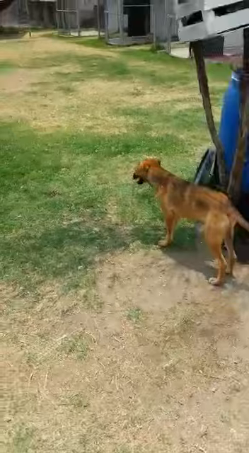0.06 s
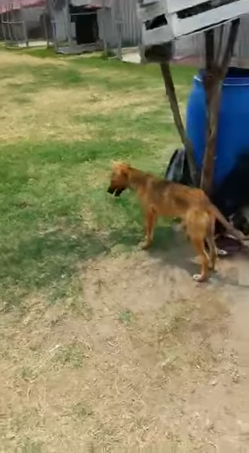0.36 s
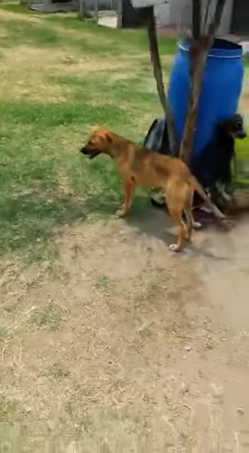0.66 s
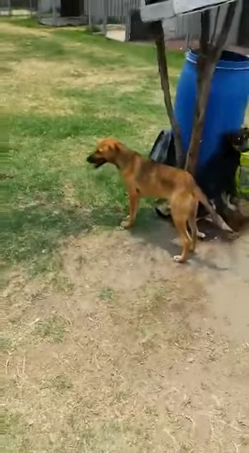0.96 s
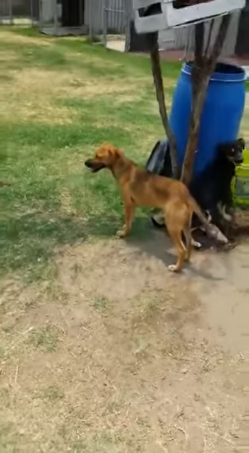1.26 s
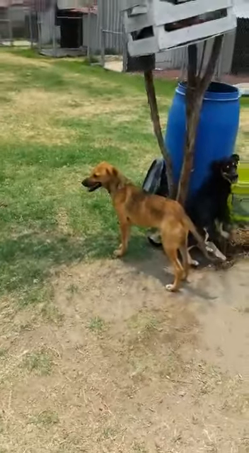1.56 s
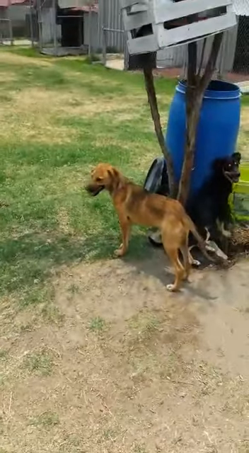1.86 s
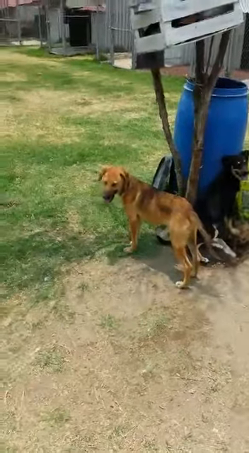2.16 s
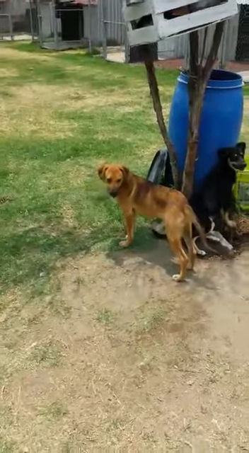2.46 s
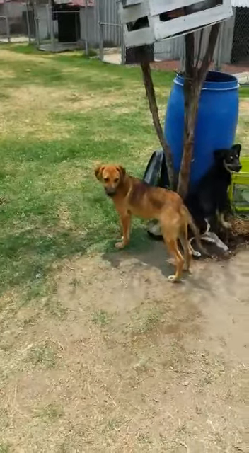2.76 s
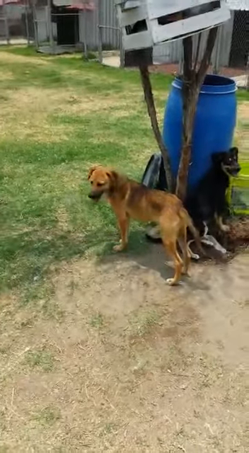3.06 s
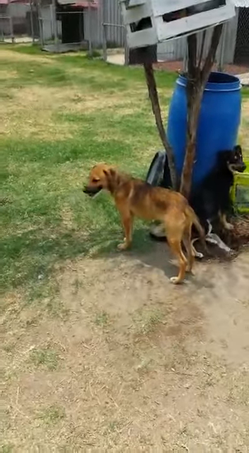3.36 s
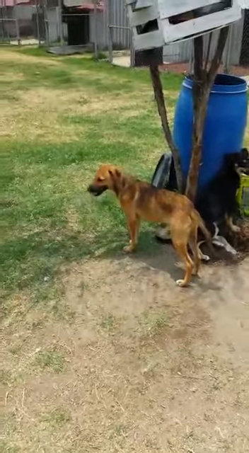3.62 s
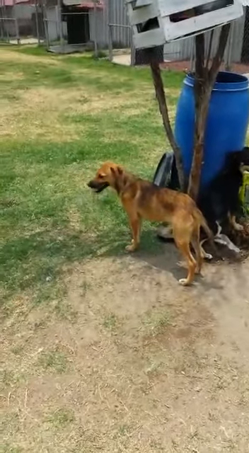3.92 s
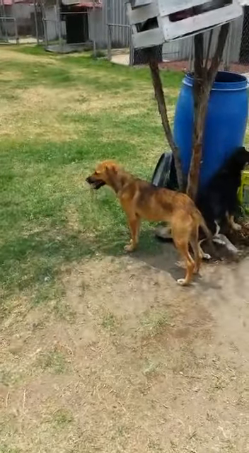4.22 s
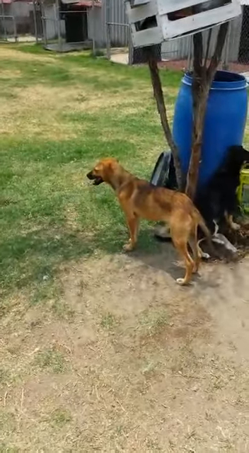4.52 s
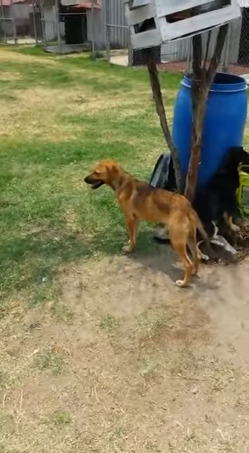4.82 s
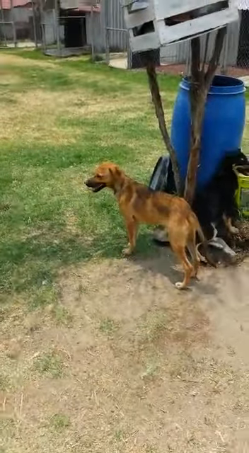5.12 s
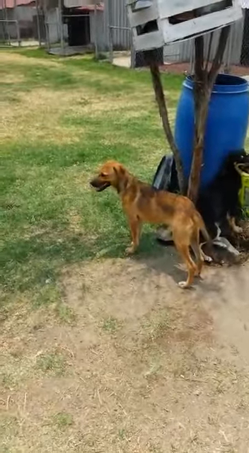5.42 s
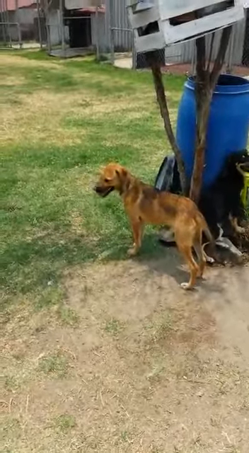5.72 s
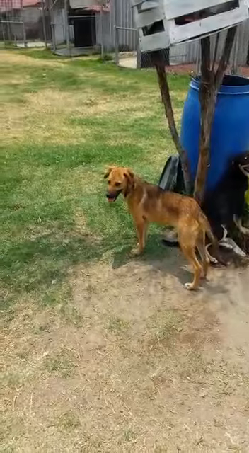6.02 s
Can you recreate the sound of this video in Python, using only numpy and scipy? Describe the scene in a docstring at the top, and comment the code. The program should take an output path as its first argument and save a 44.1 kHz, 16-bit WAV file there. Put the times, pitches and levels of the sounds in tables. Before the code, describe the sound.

Two dogs bark in turn in a yard while sparrows chirp and gusts of wind rumble on the microphone.

```python
"""A grassy yard, heard through the two microphone ports of a hand-held phone.
Two dogs bark in turn, uneven vocal folds and rasping air ringing the throat; sheds throw each bark
back and a far dog yelps once. Sparrows whistle and chatter in the trees, two-voiced from the syrinx.
Gusts buffet each port on its own with rumble and eddy slaps, over an outdoor wash and a thin whine."""
import sys
import numpy as np
from scipy import signal
from scipy.fft import rfft, irfft
from scipy.io import wavfile
from scipy.ndimage import uniform_filter1d, map_coordinates

SR = 44100
rng = np.random.default_rng(int(sys.argv[2]) if len(sys.argv) > 2 else 0)


def to_wav(s):
    """Save 16-bit WAV."""
    ch = np.atleast_2d(s).T  # columns
    pcm = np.round(np.clip(ch, -1, 1) * 32767)  # PCM
    wavfile.write(sys.argv[1], SR, pcm.astype(np.int16))


N = 272538
TIME = np.arange(N) / SR
FREQ = np.fft.rfftfreq(N, 1 / SR)


def undb(db):
    """Decibels to gain."""
    return 10 ** (np.asarray(db) / 20)


def unit_rms(x):
    """Scale to rms 1."""
    return x / np.sqrt(np.mean(x ** 2) + 1e-18)


def curves(table, at):
    """Interpolate each later column over the first."""
    first, *columns = np.transpose(table)
    return [np.interp(at, first, column) for column in columns]


def spectrum(table, hz):
    """Gain from (freq_hz, gain_db) points on a log-frequency axis."""
    points_hz, db = np.transpose(table)
    return undb(np.interp(np.log(hz + 1e-3), np.log(points_hz), db))


def colour(x, table):
    """Filter by (freq_hz, gain_db) points."""
    size = x.shape[-1]
    return irfft(rfft(x) * spectrum(table, np.fft.rfftfreq(size, 1 / SR)), size)


def wander(size, rate_hz):
    """Smooth random curve, spread about 1."""
    at = np.arange(size) / SR * rate_hz
    return map_coordinates(rng.standard_normal(4096), [at], order=3, mode="wrap")


def jittered_phase(hz, size, jitter, rate_hz):
    """Phase of an oscillator whose pitch wanders by the fraction jitter."""
    return 2 * np.pi * np.cumsum(hz * (1 + jitter * wander(size, rate_hz))) / SR


def add(track, start_s, x):
    """Mix x into track at start_s."""
    start = max(int(start_s * SR), 0)
    part = track[..., start:start + x.shape[-1]]
    part += x[..., :part.shape[-1]]


def ports(x, left_lag_s):
    """Stereo pair; sound reaches the left port left_lag_s after the right."""
    left = irfft(rfft(x) * np.exp(-2j * np.pi * FREQ * left_lag_s), N)
    return np.array([left, x])


def balance(pair, table):
    """Each port has its own colour: split a left-minus-right curve between them."""
    tilt = np.sqrt(spectrum(table, FREQ))
    return irfft(rfft(pair) * np.array([tilt, 1 / tilt]), N)


# wash spectrum: freq_hz, gain_db
AIR_SPECTRUM = [(40, -1), (150, -1.5), (350, -7), (500, -10), (700, -10.5), (1400, -12.5), (3000, -14),
                (6500, -15), (8600, -15), (9600, -21), (11000, -19.5), (12000, -22.5), (15500, -21.5)]
# wash envelope: time_s, level_db
AIR_LEVEL = [(0, -48.5), (.6, -49), (2.4, -48), (3.3, -48), (4.1, -50), (4.6, -51.5), (5.2, -50),
             (6.18, -46.5)]
# wash balance: freq_hz, left_minus_right_db
AIR_BALANCE = [(300, 0), (1300, 3.5), (4400, 3.5), (6600, 6), (8300, -13), (10500, -15.5), (12000, 0.5),
               (15000, -1)]
# electronic whine: freq_hz, left_db, right_db
WHINE = [(8000, -86, -76), (10000, -74, -59)]


def background(flicker_db=.7):
    """Distant outdoor wash and microphone hiss, plus the phone's thin whine."""
    level_db, = curves(AIR_LEVEL, TIME)
    common = colour(rng.standard_normal(N), [(200, 8), (600, 2), (1300, -2.5), (3000, -12.5)])
    wash = unit_rms(colour(rng.standard_normal((2, N)) + common, AIR_SPECTRUM))
    wash *= undb(level_db + flicker_db * wander(N, 6))
    whine = sum(undb([[left_db], [right_db]]) * np.sqrt(2) * np.sin(2 * np.pi * hz * TIME)
                for hz, left_db, right_db in WHINE)
    return balance(wash, AIR_BALANCE) + whine


# one chirrup (flick, fall, lower arch):
# delay_s, length_s, start_ratio, mid_ratio, end_ratio, gain_db, second_voice_gain
CHIRRUP_SYLLABLES = [(0, .018, 1.02, 1.18, 1.32, -1, .2), (.012, .056, 1, 1, .74, 1.5, 1),
                     (.09, .058, .6, .85, .58, -2, .3)]
# chirrups: start_s, pitch_hz, level_db, second_voice_gain
CHIRRUPS = [(0.288, 4400, -43, .3), (1.859, 4420, -43, .9), (3.578, 4430, -49, 0.86),
            (5.467, 4420, -45, 0.8)]
# falling whistles: start_s, length_s, start_hz, level_db
SLURS = [(0.01, .036, 5120, -51), (1.66, .044, 6160, -48), (3.094, 0.043, 3970, -58),
         (4.489, .083, 3700, -62), (4.784, 0.066, 3860, -54), (5.023, 0.065, 3500, -57),
         (5.28, .05, 4000, -58), (5.529, 0.027, 4800, -39.5), (5.538, 0.071, 3410, -47),
         (5.586, 0.043, 3690, -51), (5.978, 0.053, 3580, -55.5)]
# bent peeps: start_s, mid_hz, ends_ratio, level_db
PEEPS = [(1.095, 4520, 0.94, -54), (1.644, 2990, .88, -56.5), (2.322, 4340, 1.12, -48.5),
         (2.41, 4490, 0.95, -52.5), (2.711, 4230, .95, -57), (3.079, 4410, 1.03, -51),
         (3.984, 4750, 0.89, -53), (4.17, 3880, 1, -57)]


def syllables(slur_ref_hz=3703, slur_octaves_per_s=11, slur_mid_ratio=1.06, peep_s=.051):
    """Yield sparrow syllables: start_s, length_s, (start, mid, end)_hz, level_db, second_voice_gain."""
    for start_s, hz, db, second_gain in CHIRRUPS:
        for delay_s, length_s, *ratios, part_db, part_second in CHIRRUP_SYLLABLES:
            pitches_hz = hz * np.array(ratios)
            yield start_s + delay_s, length_s, pitches_hz, db + part_db, second_gain * part_second
    for start_s, length_s, hz, db in SLURS:
        octaves = slur_octaves_per_s * length_s * (hz / slur_ref_hz) ** 1.25  # higher falls faster
        pitches_hz = np.linspace(hz, hz / 2 ** octaves, 3) * [1, slur_mid_ratio, 1]
        yield start_s, length_s, pitches_hz, db, .15
    for start_s, hz, ends_ratio, db in PEEPS:
        yield start_s, peep_s, hz * np.array([ends_ratio, 1, ends_ratio]), db, .1


# harsh chatter further off: start_s, length_s, pitch_hz, level_db
CHATTER = [(0.0, 0.072, 5500, -46.5), (0.495, 0.22, 5650, -43.5), (1.159, 0.13, 5550, -44),
           (4.772, .19, 5530, -48), (5.218, .15, 5520, -49)]


def sparrows(second_ratio=1.095, flutter_db=2.5, wall_s=.015, wall_db=-8, yard_db=-5, right_db=-4.5):
    """Gliding whistles, the syrinx's other side just above, and buzzy chatter; a wall doubles both."""
    dry = np.zeros(N)
    for start_s, length_s, pitches_hz, db, second_gain in syllables():
        size = int(length_s * SR)
        glide_hz = np.polyval(np.polyfit([0, .5, 1], pitches_hz, 2), np.linspace(0, 1, size))
        for ratio, gain in ((1, 1), (second_ratio, second_gain)):
            whistle = np.sin(jittered_phase(glide_hz * ratio, size, jitter=.025, rate_hz=716))
            envelope = signal.windows.tukey(size, .3) * undb(db + flutter_db * wander(size, 161))
            add(dry, start_s, gain * whistle * envelope)
    for start_s, length_s, hz, db in CHATTER:
        size = int(length_s * SR)
        buzz = np.sin(jittered_phase(hz, size, jitter=.113, rate_hz=2200))
        envelope = signal.windows.tukey(size, .7) * undb(db + flutter_db * wander(size, 116.5))
        add(dry, start_s, buzz * envelope)
    direct = ports(dry, left_lag_s=.00028)
    wall = np.roll(ports(dry, left_lag_s=-.000386), int(wall_s * SR), axis=1)
    return (direct + undb(wall_db) * wall + undb(yard_db) * yard(dry)) * undb([[0], [right_db]])


# yard reverberation: band_hz, t60_s, gain_db
YARD_BANDS = [(304, 0.57, 2.5), (835, .7, 7), (1380, 0.72, 6.5), (2310, 0.82, -1.5), (4140, 1, 1.5),
              (4970, 0.38, 5), (5740, 0.51, 1), (7700, 0.092, -21), (14250, 0.49, -8)]


def yard(x, coherence_hz=900, build_s=.008):
    """Scatter off sheds, fences and trees builds, then decays by band; lows are alike at both ports."""
    t = TIME[:SR]
    hz = np.fft.rfftfreq(SR, 1 / SR)
    band_hz, t60_s, gain_db = np.transpose(YARD_BANDS)
    coherence = np.exp(-(hz / coherence_hz) ** 2 / 2)
    mid, side = rfft(rng.standard_normal((2, SR))) * np.sqrt([1 + coherence, 1 - coherence])
    tail = 0
    for k, selector in enumerate(np.eye(len(band_hz))):
        band_gain = np.interp(np.log(hz + 1), np.log(band_hz), selector)
        band = irfft(np.array([mid + side, mid - side]) * band_gain, SR)
        fade = undb(-60 * t / t60_s[k]) * (1 - np.exp(-t / build_s))
        tail = tail + undb(gain_db[k]) * band * fade / np.sqrt(2 * np.sum(fade ** 2))
    return signal.fftconvolve(x[None], tail, axes=1)[:, :N]


# gusts: start_s, hold_s, left_db, right_db
GUSTS = [(0.30, 0.04, -56, -39.5), (0.489, 0.13, -28.5, -45.5), (0.673, 0.12, -45, -27),
         (0.827, 0.13, -31, -19.5), (0.967, 0.23, -33.5, -24.5), (1.195, 0.094, -25.5, -26),
         (1.31, 0.14, -43, -27), (1.49, 0.14, -31, -23), (1.627, 0.053, -21.5, -31),
         (1.733, .21, -37, -25.5), (1.98, 0.042, -17.5, -38), (2.075, 0.045, -20.5, -22),
         (2.166, 0.13, -18, -30), (2.481, 0.11, -59, -25.5), (2.611, 0.16, -29.5, -26.5),
         (2.854, 0.12, -35, -40), (3.168, .14, -46, -28.5), (3.425, 0.16, -41, -27), (3.66, .16, -32, -33),
         (3.88, 0.14, -51, -43.5), (4.368, 0.055, -41, -43), (4.799, 0.12, -31, -40.5),
         (4.917, 0.055, -35, -28.5), (5.052, 0.077, -33, -53), (5.252, 0.11, -51, -22),
         (5.379, 0.092, -19.5, -17), (5.606, 0.13, -37, -25.5), (5.785, 0.015, -46, -20.5),
         (6.015, 0.088, -20.5, -21), (6.159, .03, -18.5, -16)]


def gusts(rise_db_per_s=589, fall_db_per_s=307, breeze_db=-55.5):
    """Wind level per port in dB: each gust rises fast, holds and dies away over a light breeze."""
    power = undb(breeze_db) ** 2
    for start_s, hold_s, left_db, right_db in GUSTS:
        before_s = np.maximum(start_s - TIME, 0)
        after_s = np.maximum(TIME - start_s - hold_s, 0)
        fade_db = np.minimum(rise_db_per_s * before_s + fall_db_per_s * after_s, 100)
        power = power + (undb([[left_db], [right_db]]) * undb(-fade_db)) ** 2
    return 10 * np.log10(power)


# rumble of a light flow: freq_hz, gain_db
RUMBLE_SPECTRUM = [(12, -30), (30, -20.5), (65, 0.5), (110, 2), (160, -3.5), (250, -17), (400, -43.5),
                   (700, -54), (1500, -80)]
# rush added by a hard gust: freq_hz, gain_db
RUSH_SPECTRUM = [(60, -2), (130, -5), (220, -3.5), (400, -13.5), (650, -34), (1100, -42.5), (2500, -57.5)]


def wind_on_port(gust_db, rumble_db=-.5, rush_db=-30, rush_growth=1.98, lumpy_db=3.5):
    """Turbulence at one port: harder flow makes smaller eddies, so the rumble reaches higher."""
    level_db = gust_db + lumpy_db * (wander(N, 55) - .3)
    layers = []
    for shape in (RUMBLE_SPECTRUM, RUSH_SPECTRUM):
        flow = unit_rms(colour(rng.standard_normal(N), shape))
        power = uniform_filter1d(np.abs(signal.hilbert(flow)) ** 2 / 2, size=900)
        layers.append(flow / np.sqrt(power + .0078))  # flattened, so level_db sets the envelope
    rumble, rush = layers
    return undb(level_db + rumble_db) * rumble + undb(rush_db + rush_growth * (level_db + 20)) * rush


def small_eddies(gust_db, rate_per_s=9, over_wind_db=9.5, spread_db=.5, centre_hz=165, spread_oct=.25):
    """Yield random eddies that scale with the wind carrying them; rows as in HARD_EDDIES."""
    count = rate_per_s * N // SR
    for port, wind_db in zip(("left", "right"), gust_db):
        for at, (strength, pitch) in zip(rng.integers(0, N, count), rng.standard_normal((count, 2))):
            level_db = wind_db[at] + over_wind_db + spread_db * strength
            yield at / SR, level_db, centre_hz * 2 ** (spread_oct * pitch), port


# hardest slaps on a port: time_s, level_db, centre_hz, port
HARD_EDDIES = [(0.552, -20, 199, "left"), (1.151, -2.5, 103, "right"), (1.269, -11, 212, "left"),
               (1.641, -6, 220, "left"), (1.683, -11.5, 149, "left"), (2.098, 0, 212, "left"),
               (2.179, -4.5, 292, "left"), (2.188, -8, 156, "left"), (2.217, -9, 190, "left"),
               (2.288, -4, 180, "left"), (2.365, -13, 160, "left"), (2.552, -10, 170, "right"),
               (2.634, -9.5, 133, "left"), (3.381, -11.5, 132, "right"), (3.435, -10, 236, "right"),
               (3.555, -9.5, 153, "right"), (4.983, -19.5, 186, "left"), (5.238, -7.5, 145, "right"),
               (5.281, -3.5, 147, "right"), (5.374, -2.5, 193, "right"), (5.438, -10, 220, "left"),
               (5.635, -9.5, 230, "right"), (5.677, -4.5, 149, "right"), (5.692, -7.5, 164, "right"),
               (6.072, -6.5, 207, "right")]


def eddies(gust_db, gain_db=-2, skirt=1.876, snap_db=-13, snap_ratio=1.69, leak_db=-35):
    """An eddy crossing a port pushes and sucks: one lopsided pressure swing with a faster core snap."""
    out = np.zeros((2, N))
    t = np.arange(-SR // 50, SR // 50) / SR
    slaps = HARD_EDDIES + list(small_eddies(gust_db))
    for (time_s, db, hz, port), skew_rad in zip(slaps, rng.uniform(-1.06, 1, len(slaps))):
        body, core = (np.real(1j * np.exp(1j * skew_rad) / (1 - 1j * np.pi * f * t / skirt) ** 4)
                      for f in (hz, hz * snap_ratio))
        swing = body + undb(snap_db) * core
        swing = colour(swing, [(20, -22), (70, -2.5), (600, -2), (1000, 4.5), (2000, -38)])
        port_db = np.where([[port == "left"], [port == "right"]], 0, leak_db)
        add(out, time_s + t[0], undb(db + gain_db + port_db) * swing * np.hanning(len(t)))
    return out


def throat(x, resonances, freq_scale):
    """Steep parallel resonances of throat and mouth; freq_scale shifts them all."""
    f = (np.fft.rfftfreq(len(x), 1 / SR) + 1e-3) / freq_scale
    response = sum(undb(db) / (1 + 1j * (f * f - hz * hz) / (f * width_hz)) ** 2
                   for hz, width_hz, db in resonances)
    return irfft(rfft(x) * response, len(x))


# pitch arch of a bark: length_fraction, top_pitch_ratio
BARK_PITCH = [(0, .55), (.18, .64), (.3, .76), (.42, .85), (.55, .92), (.68, .985), (.8, 1.0), (1, .93)]
# course of a bark: length_fraction, level_db, roughness_gain, treble_db
BARK_SHAPE = [(0, -22, 0.8, -7), (.15, -13.5, .5, 8), (.3, -4, 0, 1.5), (.45, 0, 0.31, 4.5),
              (.65, -1.5, 0.04, 5.5), (.8, -3, 0.39, -10), (.9, -15.5, 0.15, -8), (1, -1, 0.65, -6)]


def bark(resonances, top_hz, arch_depth, length_s, gain_db, rasp_db, mouth_treble_db,
         shimmer=.28, subharmonic_db=-20, hiss_db=-6, rolloff_hz=2800):
    """Vocal folds rise in pitch and beat unevenly; air rasps through once a cycle; the jaws open."""
    size = int(length_s * SR)
    course = np.arange(size) / size
    pitch_hz = top_hz * curves(BARK_PITCH, course)[0] ** arch_depth
    level_db, roughness, treble_db = curves(BARK_SHAPE, course)
    phase = jittered_phase(pitch_hz, size, jitter=.012, rate_hz=263.2)
    k = np.arange(1, 25)[:, None]
    spread_rad = np.pi * k * k / 10  # the folds close along their length, spreading each pulse
    rolloff = np.sqrt(1 + (k * top_hz / rolloff_hz) ** 4)
    folds = np.sum(np.cos(k * phase - spread_rad) / rolloff, axis=0)
    # strong and weak cycles put lines between the harmonics
    folds *= 1 + shimmer * wander(size, 349.5) + 2 * undb(subharmonic_db) * np.cos(phase / 2)
    air = rng.standard_normal(SR)[:size] * (1 + 1.02 * np.cos(phase))
    hiss = colour(air, [(1500, -5), (2600, -17), (4500, -11), (9000, 3), (14000, -11)])
    rasp = 5 * (roughness * air + undb(hiss_db) * hiss)
    source = (folds + undb(rasp_db) * rasp) * undb(level_db) * signal.windows.tukey(size, .1)
    treble = colour(source, [(700, -72), (1400, -1), (4000, -8.5)])
    source += (undb(treble_db + mouth_treble_db) - 1) * treble
    # half-shut jaws lower the resonances at the start
    jaw = np.interp(course, [.28, .52], [0, 1])
    shut, wide = np.pad([source * (1 - jaw), source * jaw], ((0, 0), (0, SR // 20)))
    voice = undb(1) * throat(shut, resonances, freq_scale=.878)
    voice += throat(wide, resonances, freq_scale=.96)
    return undb(gain_db) * voice


# barks: start_s, top_hz, arch_depth, length_s, gain_db, rasp_db, mouth_treble_db
FIRST_DOG_BARKS = [(0.551, 403.4, 0.94, 0.15, -27, 1, -4.5), (0.80, 357.4, 0.34, 0.15, -30.5, 2, -22),
                   (1.278, 371.4, .55, .15, -30.5, 0.5, -6.5), (1.915, 405, 0.89, 0.16, -26, -0.5, 0.5)]
SECOND_DOG_BARKS = [(3.690, 410.8, 0.99, .15, -27, -1.4, 1.4), (4.194, 406.6, 0.99, .15, -34.5, -3.5, 0.64)]
# throat and mouth resonances before freq_scale: centre_hz, width_hz, gain_db
FIRST_DOG_THROAT = [(465, 282, -1), (736, 186, -1), (1124, 370, -9), (1506, 92, -6), (2180, 460, -11.5),
                    (2780, 330, -11.5), (3430, 540, -14), (5280, 220, -4.5), (5950, 460, -9),
                    (6600, 1020, -12), (7800, 290, -18), (11400, 4900, -37)]
SECOND_DOG_THROAT = [(489, 280, 2), (784, 230, 1), (1060, 290, -7.5), (1512, 117, -4.5), (1944, 200, -5.5),
                     (2240, 220, -7.5), (3500, 510, -15), (5000, 180, -9), (5430, 220, -5.5),
                     (6260, 1430, -7), (6700, 360, -22), (7420, 450, -5), (8140, 800, -12),
                     (11100, 600, -30)]
# echoes off the sheds: delay_s, gain_db, left_lag_s
SHED_ECHOES = [(.028, -13.5, -0.018), (.062, -25, -0.025), (.092, -3, .0001), (.135, -18, -0.0071)]
# port colour for the barks: freq_hz, left_minus_right_db
BARK_BALANCE = [(300, 6.5), (750, -1), (1500, 1.5), (2300, 12), (3000, -8.5), (4000, 14.5), (4900, -2.5),
                (6500, 10.5), (7300, -5.5), (8300, -15.5), (9600, -22), (11500, -21), (14000, -10)]
DOG_LEFT_LAG_S = .00024


def dogs(yard_db=-7):
    """Barks arrive from the right, then again off the sheds, duller."""
    dry = np.zeros(N)
    for barks, resonances in ((FIRST_DOG_BARKS, FIRST_DOG_THROAT), (SECOND_DOG_BARKS, SECOND_DOG_THROAT)):
        for start_s, *call in barks:
            add(dry, start_s, bark(resonances, *call))
    out = ports(dry, DOG_LEFT_LAG_S)
    dull = colour(dry, [(400, -12), (650, -8), (810, 3.5), (1200, -20), (2500, -17.5),
                        (6000, -16), (12000, -15)])
    for delay_s, gain_db, left_lag_s in SHED_ECHOES:
        add(out, delay_s, undb(gain_db) * ports(dull, left_lag_s))
    return balance(out + undb(yard_db) * yard(dry), BARK_BALANCE)


# far dog's yelp: time_s, pitch_hz, level_db
YELP = [(2.90, 424.4, -75), (2.925, 446.3, -54), (2.96, 521.6, -54), (3.01, 549, -68), (3.05, 514, -50.5),
        (3.07, 473, -78)]


def far_dog(harmonics_db=(5, -3, -11, -3), yard_db=-3):
    """One higher, purer yelp from beyond the yard."""
    pitch_hz, level_db = curves(YELP, TIME)
    phase = jittered_phase(pitch_hz, N, jitter=.012, rate_hz=150)
    voice = sum(undb(db) * np.sin(k * phase) for k, db in enumerate(harmonics_db, 1))
    sounding = (TIME > YELP[0][0]) & (TIME < YELP[-1][0])
    dry = voice * undb(level_db) * sounding
    return ports(dry, DOG_LEFT_LAG_S) + undb(yard_db) * yard(dry)


def scene():
    """Dogs, sparrows and wind over the quiet of the yard."""
    gust_db = gusts()
    wind = np.array([wind_on_port(port_db) for port_db in gust_db])
    return dogs() + far_dog() + sparrows() + wind + eddies(gust_db) + background()


def record(dry):
    """The phone's steep low-pass."""
    cutoff_hz = 15550
    return signal.sosfilt(signal.ellip(10, .2, 80, cutoff_hz, fs=SR, output="sos"), dry)


dry = scene()
out = record(dry)
to_wav(out)
```